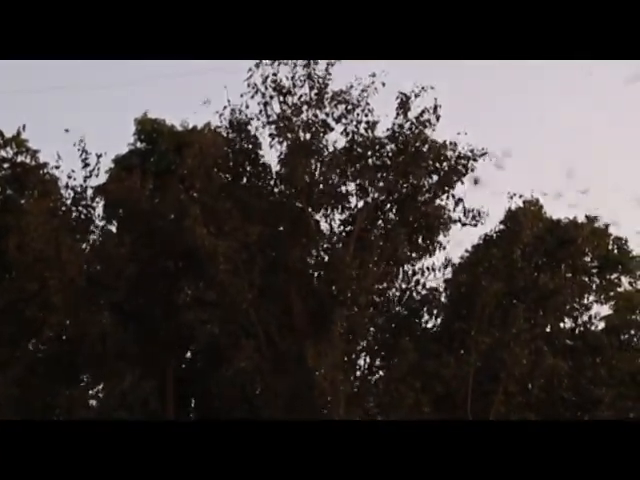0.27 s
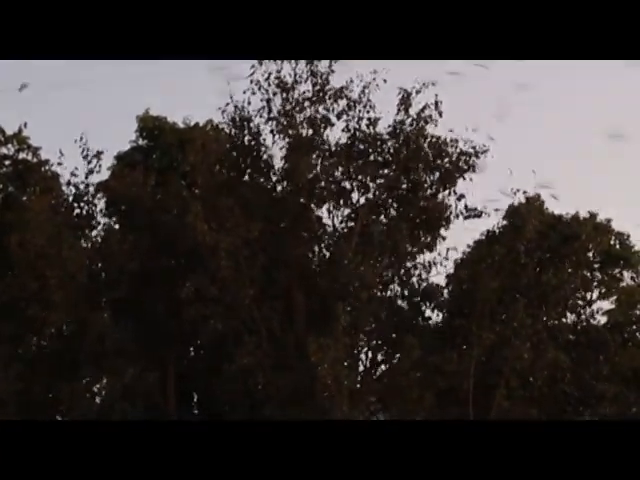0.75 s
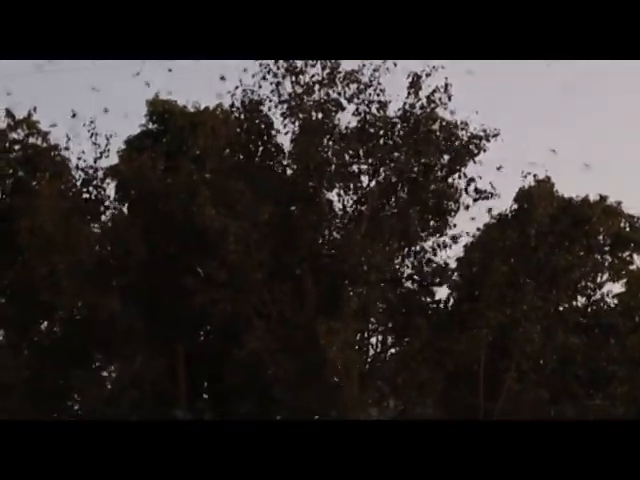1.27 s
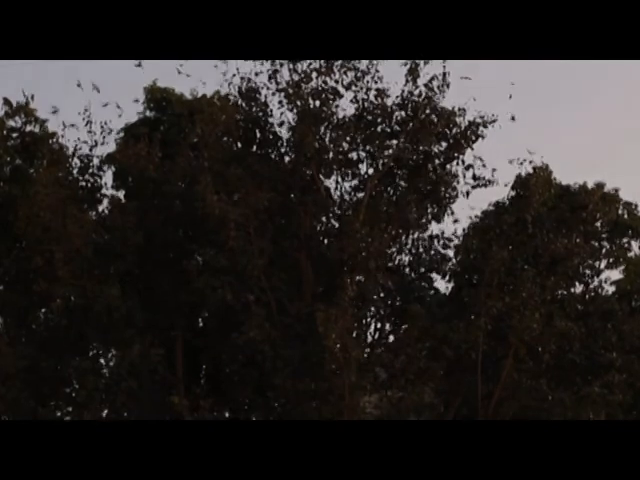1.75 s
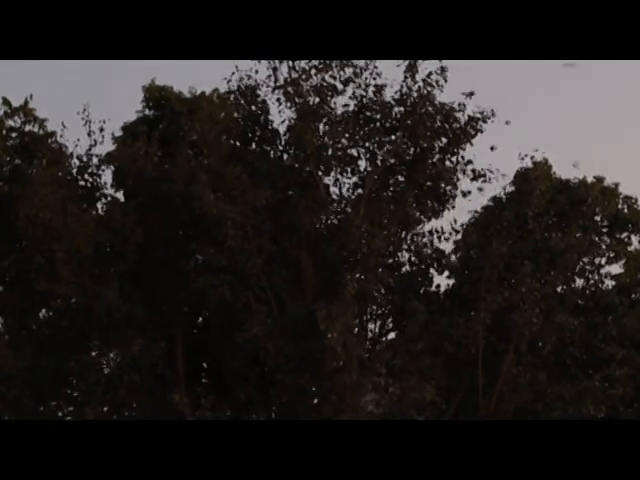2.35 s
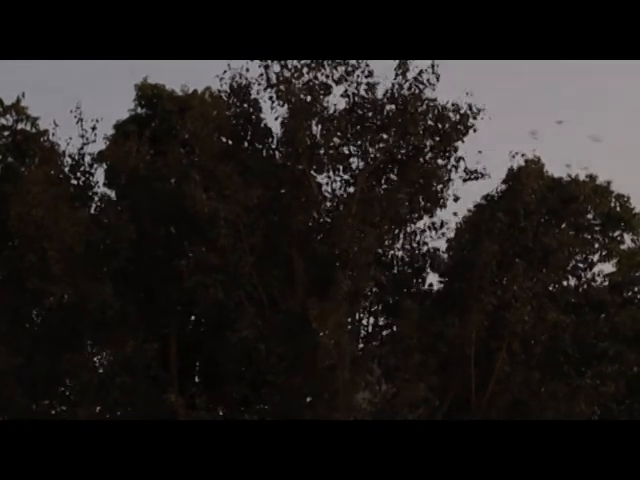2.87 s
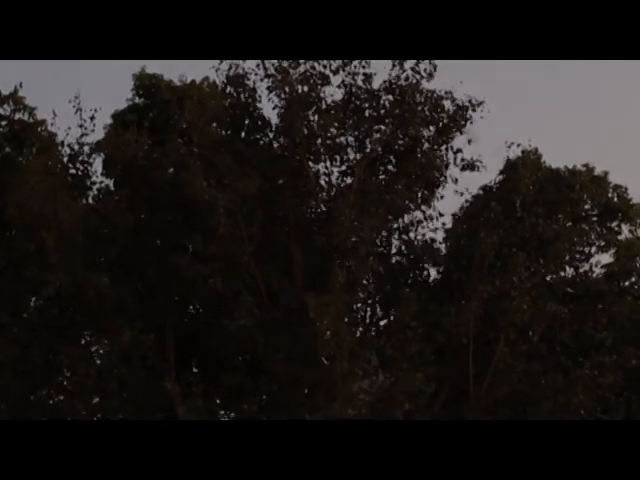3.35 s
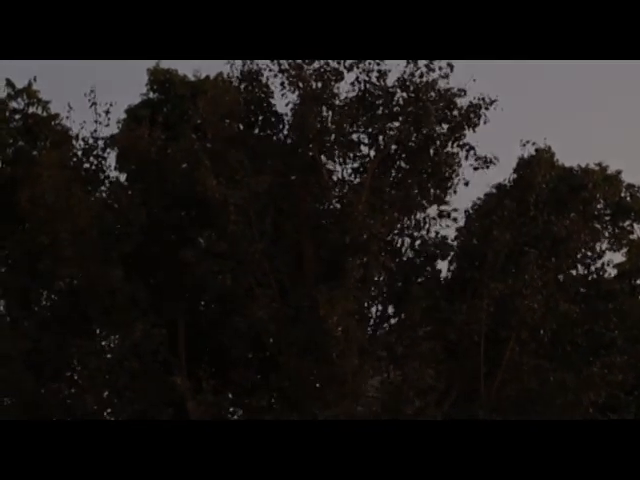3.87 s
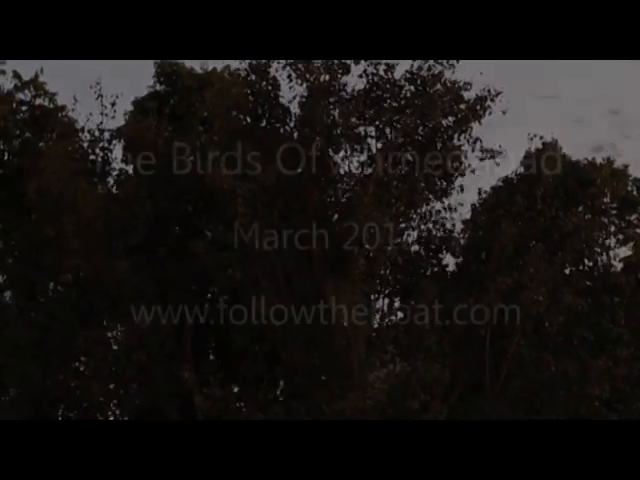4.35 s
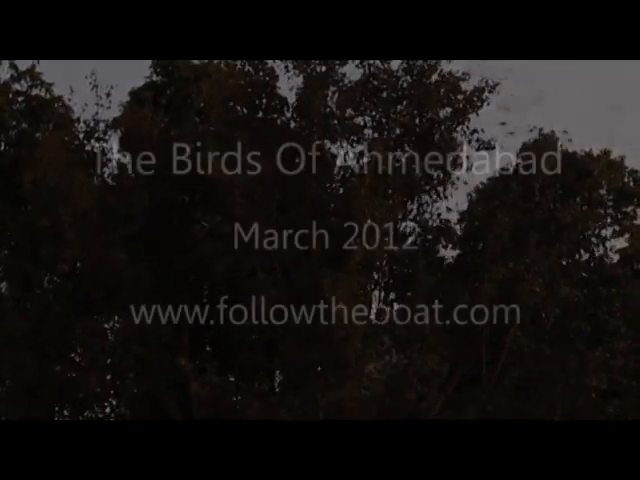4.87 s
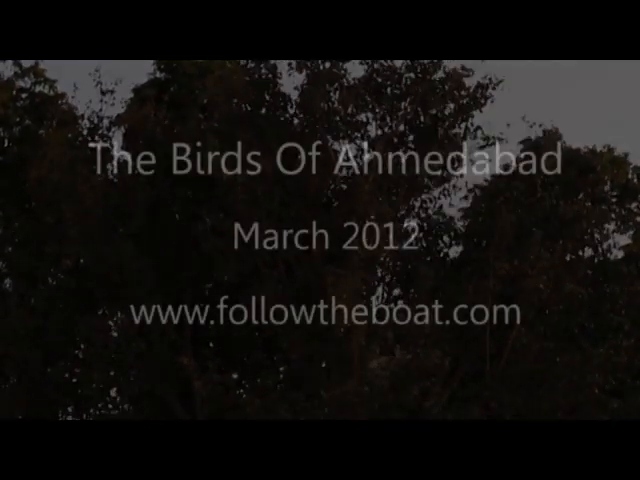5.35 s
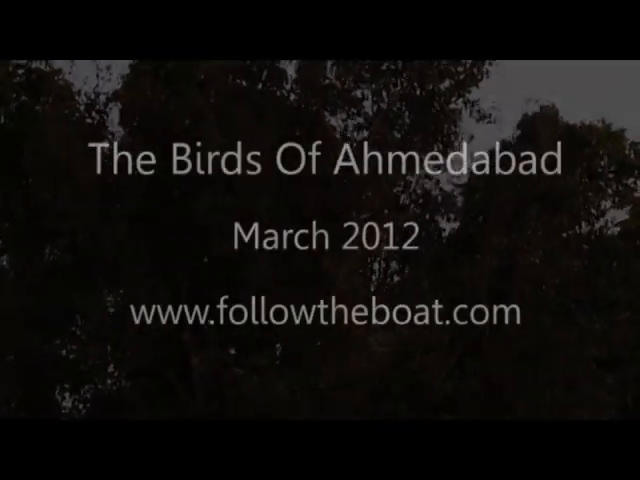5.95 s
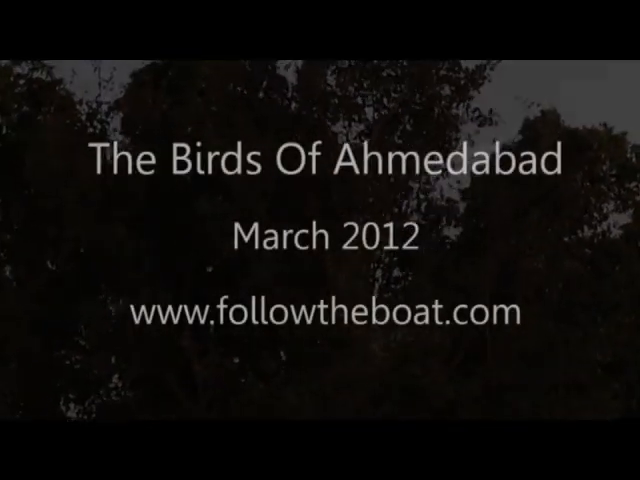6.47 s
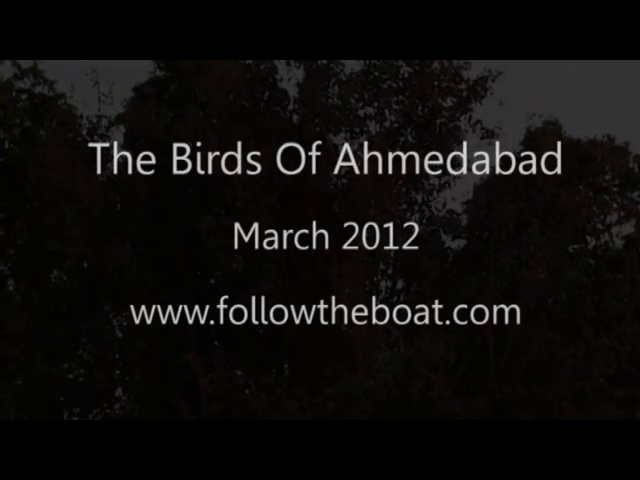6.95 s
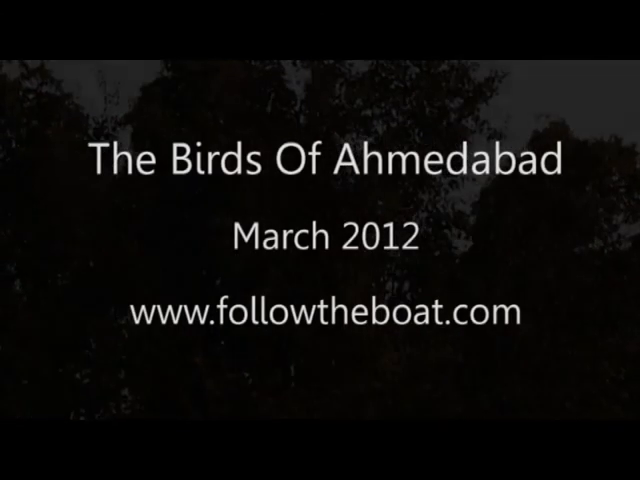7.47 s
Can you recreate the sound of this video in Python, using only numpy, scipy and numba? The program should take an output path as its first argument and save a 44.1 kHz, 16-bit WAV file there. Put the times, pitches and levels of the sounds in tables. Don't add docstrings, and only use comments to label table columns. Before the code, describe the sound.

A dense, shrill wash of roosting birds fills the scene from the start, its tiny chirps flickering between deeper and higher voices. Brief hard chips stand out early, the strongest around three seconds. Far behind are rough caws, weak vehicle horns, town murmur and slight electrical hum. Dull handling taps are barely noticeable. Open-air, almost mono camera sound with automatic level control fades continuously but is still audible at the end.

```python
import sys
import numpy as np
from scipy import signal
from scipy.fft import rfft, irfft
from scipy.io import wavfile
from scipy.ndimage import uniform_filter1d
from numba import njit

SR = 44100
rng = np.random.default_rng(int(sys.argv[2]) if len(sys.argv) > 2 else 0)


def invert_db(x):
    u = np.asarray(x, float) / 20
    return 10 ** u


def persist_wave(psi):
    counts = np.round(np.clip(psi, -1, 1) * 32767).astype(np.int16)
    wavfile.write(sys.argv[1], SR, np.atleast_2d(counts).T)


N = 340011
TIME = np.arange(N) / SR
FRAME = 1024


def level(x, db):
    return x * invert_db(db) / np.sqrt(np.mean(x ** 2))


def colour(x, points):
    hz, db = np.transpose(points)
    f = np.maximum(np.arange(N // 2 + 1) * SR / N, 1)
    return irfft(rfft(x) * invert_db(np.interp(np.log(f), np.log(hz), db)), N)


def resonance(x, hz, width_hz):
    b, a = signal.iirpeak(hz, hz / width_hz, fs=SR)
    return signal.lfilter(b, a, signal.lfilter(b, a, x))


def call_envelope(start_s, length_s):
    i, n = int(start_s * SR), int(length_s * SR)
    return slice(i, i + n), np.sin(np.pi * np.arange(n) / n) ** 0.49


def walk(rate_hz):
    k = int(SR / rate_hz)
    held = np.repeat(rng.standard_normal(N // k + 1), k)
    w = uniform_filter1d(uniform_filter1d(held, k), k)[:N]
    return (w - w.mean()) / w.std()


def bumps(times_s, dbs, width_s):
    return sum(db * np.exp(-0.5 * ((TIME - s) / width_s) ** 2) for s, db in zip(times_s, dbs))


@njit
def chirps(n, start, length, hz, glide, size, turn):
    out = np.zeros(n)
    for k in range(len(start)):
        m, i = int(length[k]), int(start[k])
        tone, step = np.exp(1j * turn[k]), np.exp(1j * hz[k])
        bend = np.exp(1j * glide[k] / m)
        for j in range(min(m, n - i)):
            bell = 4 * j / m * (1 - j / m)
            out[i + j] += size[k] * bell * bell * tone.imag
            tone *= step
            step *= bend
    return out


def birds(count, length_s, glide_hz, spread_db):
    lead_in = 4096
    when, pitch, long, slide, near, turn = rng.random((count, 6)).T
    glide = glide_hz * (2 * slide - 1.2)
    hz = 1200 + 13000 * pitch - glide / 2
    length = SR * length_s * 2 ** (2 * long - 1)
    size = invert_db(-spread_db * np.log(near + 0.01)) / np.sqrt(length)
    rad = 2 * np.pi / SR
    total = N + lead_in
    out = chirps(total, when * total, length, rad * hz, rad * glide, size, 2 * np.pi * turn)
    return out[lead_in:]


# frequency in Hz, density in dB per Hz.
FLOCK_COLOUR = [(1300, -58), (2000, -25), (2300, -17), (2600, -9), (2900, -5), (3500, -3.5), (4000, -1.5),
                (4450, 0.5), (5150, -3.5), (5850, -1), (6700, -6.5), (8000, -21.5), (9500, -36.5),
                (12000, -67)]
# frequency in Hz, density in dB per Hz.
AIR_COLOUR = [(5000, -25), (8500, -11), (10200, -10.5), (11700, -6), (12600, -12), (16400, -52),
              (22000, -120)]


def flock():
    chips = birds(count=40000, length_s=0.01013, glide_hz=1800, spread_db=2.0)
    whistles = birds(count=14000, length_s=0.04, glide_hz=1600, spread_db=2.0)
    blur = rng.standard_normal(N)
    mix = level(chips, -10) + level(whistles, -8) + level(blur, 1)
    return level(colour(mix, FLOCK_COLOUR), 0) + level(colour(blur, AIR_COLOUR), -42.5)


# centre in seconds, gain in dB of the deep, the middle and the shrill callers.
KNOTS = [(.12, 0.5, -0.5, 1.2), (.21, -0.5, 2, 0), (.62, 1, -0.5, .5), (.78, -1.8, 1.5, -0.5),
         (.93, -0.5, 3, 0.2), (1.42, -2.5, 2.5, 0.5), (1.83, -1, 0.5, 0.7), (2.18, 0.5, -2.5, .8),
         (2.5, 1.4, -1.5, 1.3), (3.05, 0, 1, -0.5), (4.12, 0, -2, -0.5), (4.25, 1.3, 1, -0.5),
         (4.78, .8, 1.5, .3), (5.13, 1, -1, 1), (6.25, -0.5, 2.5, -0.5), (7.1, -1, 3, -0.3),
         (7.37, 0.5, 1.5, -1), (7.68, 0.5, 2, -0.5)]


def voices(x):
    times_s, *leads = np.transpose(KNOTS)
    deep_db, middle_db, shrill_db = (bumps(times_s, dbs, 0.048) + 0.15 * walk(5) for dbs in leads)
    deep = signal.sosfiltfilt(signal.butter(3, 3600, fs=SR, output="sos"), x)
    shrill = signal.sosfiltfilt(signal.butter(3, 5200, "high", fs=SR, output="sos"), x)
    middle = x - deep - shrill
    return deep * invert_db(deep_db) + middle * invert_db(middle_db) + shrill * invert_db(shrill_db)


# frequency in Hz, density in dB per Hz.
TOWN_COLOUR = [(12, -42), (20, -9), (100, 0), (185, -2), (268, -9.5), (731, -7.5), (1200, -10.5),
               (1770, -4.5), (2030, -11.5), (2200, -16.5), (2860, -26), (4840, -120)]
# frequency in Hz, level in dB relative to the flock.
MAINS_HUM = [(100, -40), (300, -48.5)]
# centre in seconds, swell in dB.
PASSES = [
    (.14, 1.5),
    (1.1, -0.5),
    (1.75, 1.5),
    (2.6, 2.5),
    (3.48, -0.5),
    (4.33, 1.5),
    (4.75, 0),
    (6.5, 1),
    (7.1, 1.5),
]


def town():
    split_hz = 280
    noise = level(colour(rng.standard_normal(N), TOWN_COLOUR), -27.5)
    rumble = signal.sosfilt(signal.butter(2, split_hz, fs=SR, output="sos"), noise)
    murmur = signal.sosfilt(signal.butter(2, split_hz, "high", fs=SR, output="sos"), noise)
    hum = sum(level(resonance(rng.standard_normal(N), hz, 10), db) for hz, db in MAINS_HUM)
    rumble_db = bumps(*np.transpose(PASSES), width_s=0.11) + walk(8)
    murmur_db = bumps([2.0], [1.1], width_s=0.77) + 0.37 * walk(4.4)
    return (rumble + hum) * invert_db(rumble_db) - murmur * invert_db(murmur_db)


# start in seconds, level in dB relative to the flock, pitch in Hz, t60 in seconds.
KNOCKS = [
    (0.189, -30, 503, 0.016),
    (1.188, -22, 400, 0.027),
    (6.856, -21.5, 340, 0.06),
]


def knocks():
    sag_s = 0.007
    out, t = np.zeros(N), TIME[:4000]
    for start_s, db, hz, t60_s in KNOCKS:
        i = int(start_s * SR)
        cycles = hz * sag_s * (1 - np.exp(-t / sag_s))
        out[i:i + len(t)] += 3 * invert_db(db - 60 * t / t60_s) * np.sin(2 * np.pi * cycles)
    return out


# start in seconds, level in dB (the peak after the gain control lies 6 dB
# lower), pitch in Hz.
NEAR_CHIPS = [
    (0.2334, -8, 5820),
    (0.5194, -15, 4510),
    (0.724, -7, 4060),
    (1.5094, -12, 4110),
    (1.7324, -7, 5600),
    (2.0994, -9, 4280),
    (3.0494, -4, 4830),
]


def near_birds():
    start_s, peak_db, hz = np.transpose(NEAR_CHIPS)
    db = peak_db - np.interp(start_s, TIME, gain_db()) - 6
    rad, one = 2 * np.pi / SR, np.ones(len(start_s))
    length, fall_hz = 0.0025 * SR * one, 1400
    return chirps(N, start_s * SR, length, rad * (hz + fall_hz / 2), -rad * fall_hz * one, invert_db(db), 0 * one)


# start in seconds, length in seconds, upper throat resonance in Hz,
# lower throat resonance in Hz, level in dB.
CAWS = [(0.326, 0.33, 1770, 1540, 5), (1.055, 0.25, 1720, 1300, 3.5), (1.252, 0.37, 1800, 1500, 4.5),
        (1.879, 0.28, 1600, 1400, 3), (2.08, 0.34, 1770, 1550, 4.5), (2.417, 0.27, 1800, 1400, 1),
        (2.956, .32, 1770, 1500, 3), (3.39, .17, 1840, 1410, 8.5), (4.55, .15, 1800, 1500, 2),
        (4.751, 0.13, 1800, 1550, 4), (5.27, 0.35, 1800, 1500, 3.5), (5.9, 0.21, 1760, 1480, 7.5),
        (6.494, 0.17, 1800, 1380, 4), (6.698, 0.21, 1600, 1460, 3)]


def crows():
    out = np.zeros(N)
    for start_s, length_s, upper_hz, lower_hz, db in CAWS:
        rate_hz = 113.7 - 40 * length_s
        where, env = call_envelope(start_s, length_s)
        jitter, breath = rng.standard_normal((2, SR // 2))[:, :len(env)]
        phase = np.cumsum(rate_hz * (1 + 0.03 * 14 * uniform_filter1d(jitter, size=200))) / SR
        pulses = np.diff(np.floor(phase), prepend=0)
        source = level(pulses, 0) + 0.45 * breath
        throat = resonance(source, upper_hz, 280) + 0.5 * resonance(source, lower_hz, 200)
        out[where] += level(throat, db - 33.5) * env
    return out


# start in seconds, length in seconds, start pitch in Hz, end pitch in Hz, level in dB.
HORNS = [(1.16, 0.12, 620, 668, 3), (1.42, .48, 689, 760, -0.5), (2.472, .1, 640, 644, 6.5),
         (3.01, 0.12, 725, 710, 4), (3.07, .21, 1740, 1790, 2), (3.42, .14, 1360, 1380, 2),
         (1.26, .12, 1860, 1830, 9), (2.949, 0.14, 600, 538, 0), (3.45, 0.21, 660, 663, 1),
         (5.133, 0.3, 650, 698, 2), (5.14, .12, 1300, 1340, 3), (5.603, 0.36, 2060, 2060, 6),
         (5.721, 0.22, 1720, 1720, 7.5), (7.08, 0.18, 1250, 1230, 1)]


def horns():
    out = np.zeros(N)
    for start_s, length_s, start_hz, end_hz, db in HORNS:
        where, env = call_envelope(start_s, length_s)
        waver = 1 + 0.14 * 30 * uniform_filter1d(rng.standard_normal(SR // 2), size=900)[:len(env)]
        hz = np.linspace(start_hz, end_hz, len(env))
        tone = np.sin(2 * np.pi * np.cumsum(hz) / SR)
        out[where] += invert_db(db - 39) * np.sqrt(2) * env * waver * tone
    return out


def scene():
    mono = voices(flock()) + near_birds() + crows() + horns() + knocks() + town()
    return np.tile(mono, (2, 1))


# start in seconds, depth in dB.
DUCKS = [
    (-.2, 2.5),
    (.245, 1),
    (.74, 0.5),
    (1.52, 0.5),
    (2.11, 1.1),
    (3.1, 0.1),
    (3.9, 0),
    (4.9, .8),
    (5.28, 0.5),
    (6.78, 1.2),
]


def gain_db():
    attack_s, recover_s, fade_end_s = 0.0089, 0.6, 8.9
    duck_db = 0
    for start_s, depth_db in DUCKS:
        since = np.maximum(TIME - start_s, 0)
        duck_db = duck_db + depth_db * (1 - np.exp(-since / attack_s)) * np.exp(-since / recover_s)
    return -19.22 + 20 * np.log10(np.clip(1 - TIME / fade_end_s, 0.01, 1)) - duck_db


def starve_top(x, gain):
    gate_db, flicker_db = -30.3, 0.9
    luck = flicker_db * np.repeat(rng.standard_normal(N // FRAME + 1), FRAME)[:N]
    lost = uniform_filter1d(1.0 * (gain + luck < gate_db), size=FRAME)
    top = signal.sosfiltfilt(signal.ellip(6, 0.1, 40, 12200, "high", fs=SR, output="sos"), x)
    return x - lost * top


def apart(x, count, db):
    out, f = np.zeros(N), np.arange(FRAME + 1) * SR / (2 * FRAME)
    for when, pitch, size in rng.random((count, 3)):
        i, hz = int(when * (N - 4 * FRAME)), 2800 + 10000 * pitch
        band = np.abs(f - hz) < 120 + 0.02 * hz
        patch = irfft(rfft(x[i + 2 * FRAME:i + 4 * FRAME]) * band)
        out[i:i + 2 * FRAME] += invert_db(db - 17 * size) * patch * np.hanning(2 * FRAME)
    return out * np.array([[1], [-1]])


def band_limit(x):
    return signal.sosfilt(signal.butter(12, 12780, fs=SR, output="sos"), x)


def record(dry):
    db = gain_db()
    wet = starve_top(dry * invert_db(db), db)
    mix = wet + apart(wet[0], count=125, db=-6.5)
    return band_limit(mix)


dry = scene()
out = record(dry)
persist_wave(out)
```